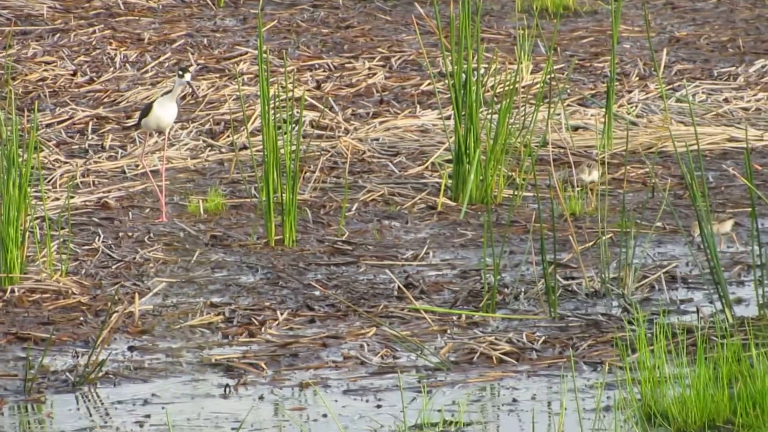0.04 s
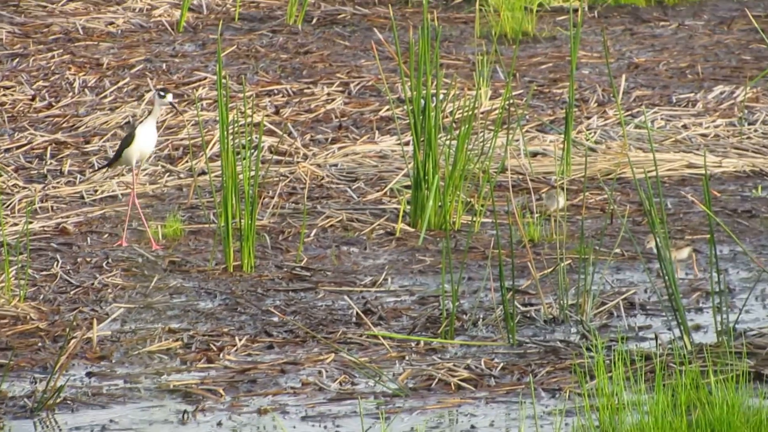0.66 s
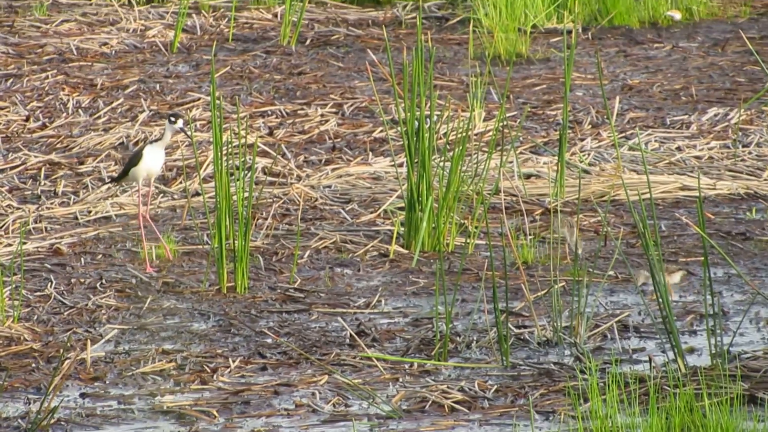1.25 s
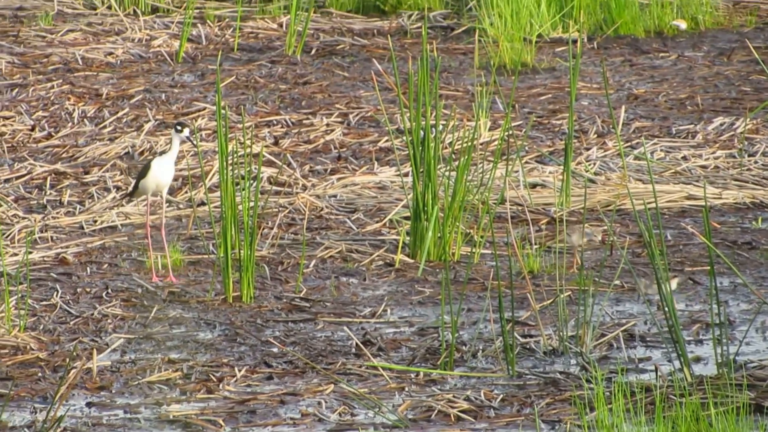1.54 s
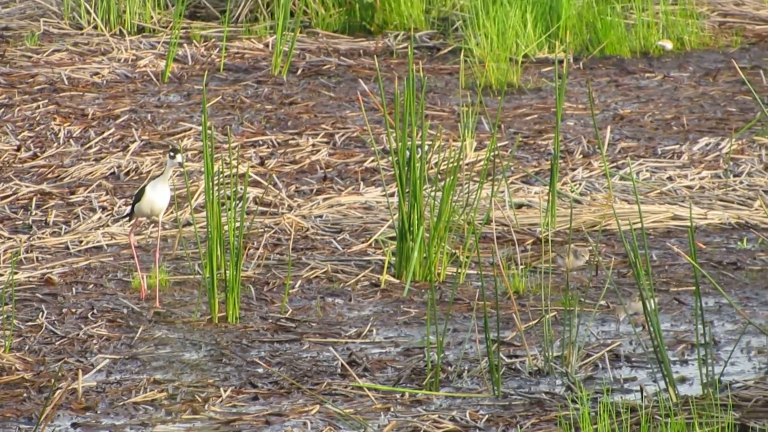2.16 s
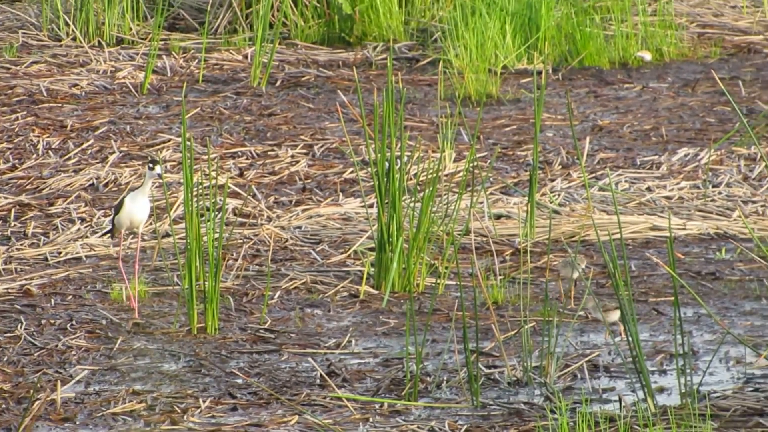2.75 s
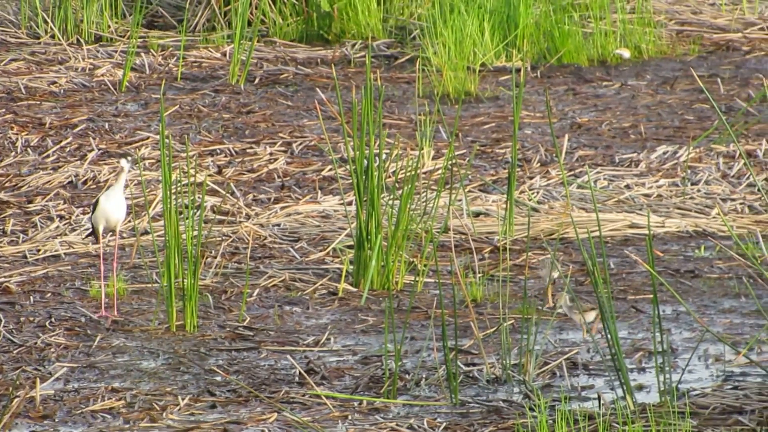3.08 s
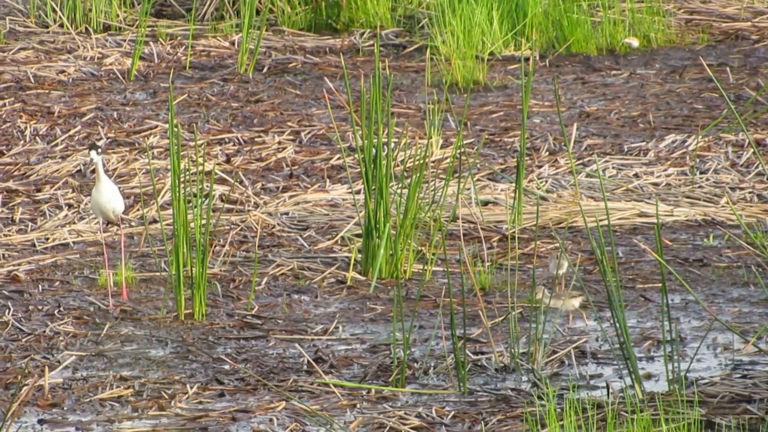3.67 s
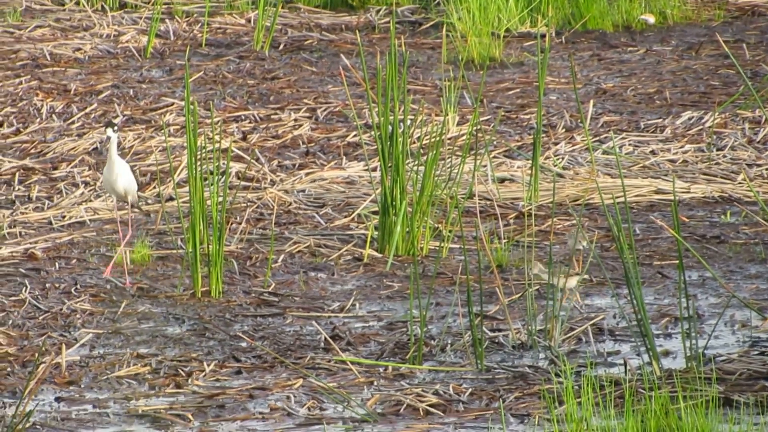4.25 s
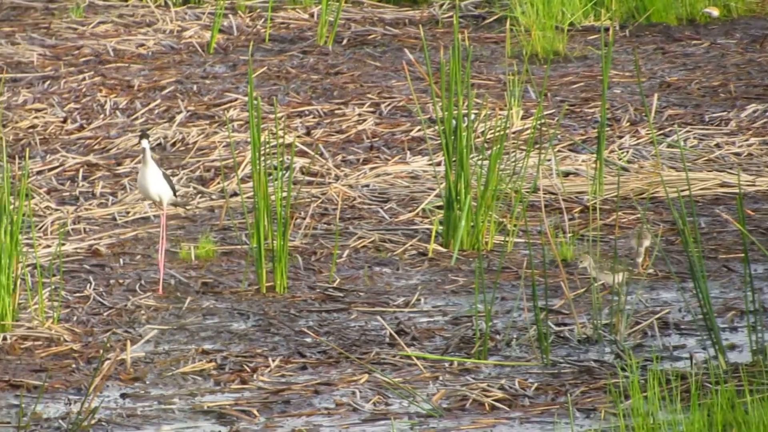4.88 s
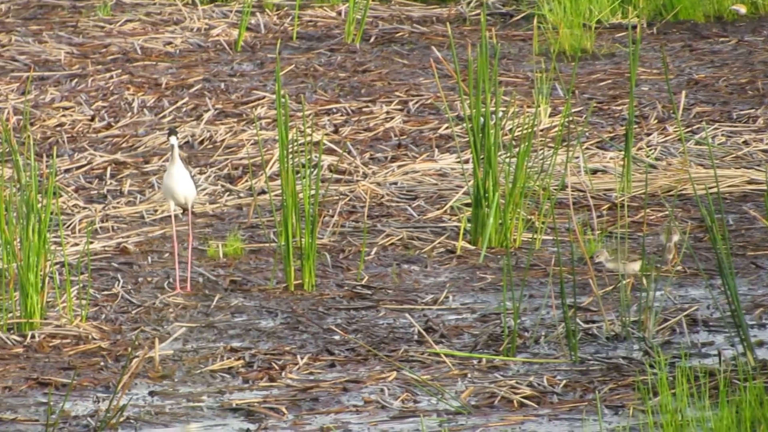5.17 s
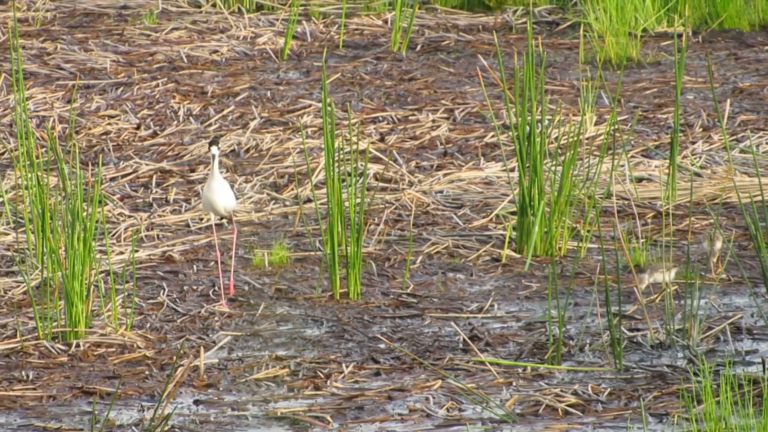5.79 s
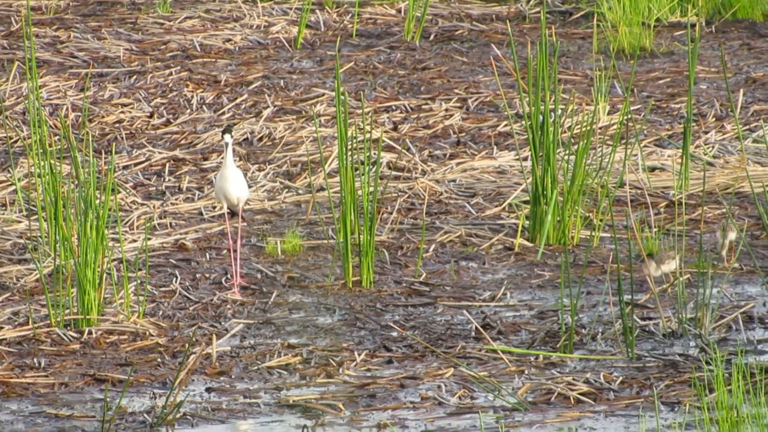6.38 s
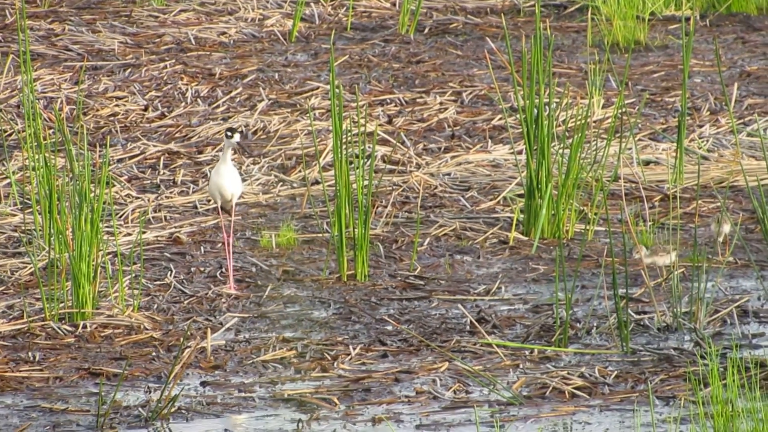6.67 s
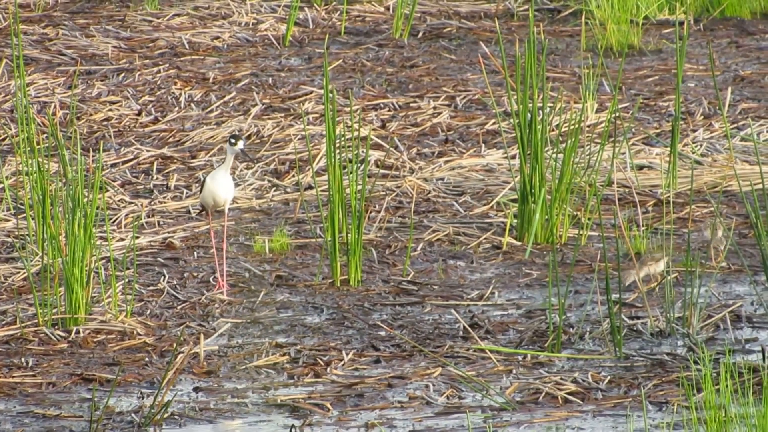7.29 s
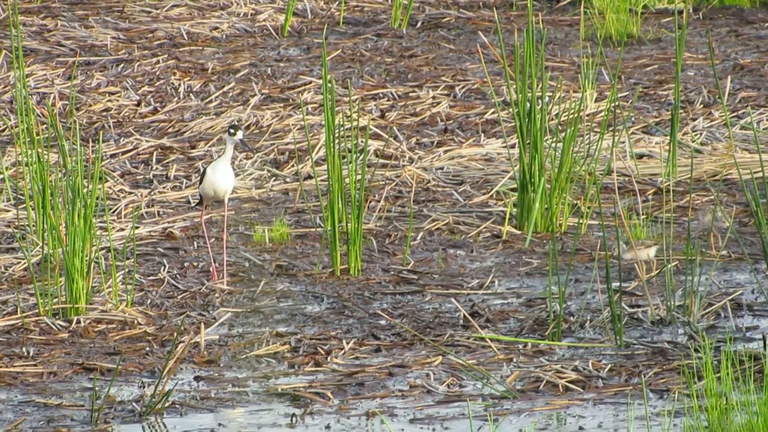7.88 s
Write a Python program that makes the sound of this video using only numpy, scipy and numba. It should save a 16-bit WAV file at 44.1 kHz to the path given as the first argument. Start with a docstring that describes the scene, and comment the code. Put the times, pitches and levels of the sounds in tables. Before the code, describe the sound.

An open marsh is heard through a wind-struck microphone for about eight seconds. A nearby wading bird gives short, sharp yips, each a quick rise and fall in pitch, roughly twice a second from 0.4 seconds to the end, clearest between 3 and 4.5 seconds. Low wind rumble and thumps are the loudest sound, coming at about 0.6 to 1.8 seconds, 2.7 to 4.7, around 6.7, and from 7.4 onward. Each hard buffet makes everything else dip and swell back. A distant songbird trills thinly, mainly between 1 and 2 seconds, and faint, hoarse, falling cries of far waders are scattered through the first six seconds. Dry stalks rustle very lightly, with sharper ticks near 2.5 and 3.3 seconds. Underneath run a steady distant roar, a low traffic-like drone that grows slightly after 5 seconds, soft hiss and a faint high whine.

```python
"""A marsh: a stilt yips close by in quick arches of pitch; far off, waders give sagging cries
and a songbird trills. Dry ticks and rustle sit over a steady distant roar and a low drone.
Gusts buffet the camera's microphone; each hard buffet drives its limiter down,
so the whole marsh ducks and swells back. The camera adds hiss and a thin whine."""
import sys
import numpy as np
from scipy import signal
from scipy.fft import rfft, irfft
from scipy.io import wavfile
from scipy.ndimage import uniform_filter1d
from numba import njit

SR = 44100
rng = np.random.default_rng(int(sys.argv[2]) if len(sys.argv) > 2 else 0)


def log_audio(samples):
    """Write samples as a 16-bit WAV file to the path given in sys.argv[1]."""
    # one column per channel
    frames = np.atleast_2d(samples).T
    # limit to full scale, then quantise
    limited = np.clip(frames, -1, 1)
    pcm = np.round(limited * 32767).astype(np.int16)
    wavfile.write(sys.argv[1], SR, pcm)


N = 349868
TIME, FREQS = np.arange(N) / SR, np.fft.rfftfreq(N, 1 / SR)


def amp(db):
    """Decibels to gain."""
    return 10 ** (np.asarray(db) / 20)


def unit(x):
    """Scale to rms 1."""
    return x / np.sqrt(np.mean(x ** 2) + 1e-20)


def at_hz(points, hz=FREQS):
    """Interpolate on a log-frequency axis."""
    freq_hz, value = np.transpose(points)
    return np.interp(np.log(hz + 1), np.log(freq_hz + 1), value)


def at_time(points):
    """Interpolate at every sample."""
    return np.interp(TIME, *np.transpose(points))


def add(mix, start_s, sound):
    """Mix in at start_s."""
    part = mix[max(round(start_s * SR), 0):][:len(sound)]
    part += sound[:len(part)]


def noise(gain):
    """Coloured noise, rms 1."""
    return unit(irfft(rfft(rng.standard_normal(N)) * gain, N))


def noise_pair(gain, correlation, balance_db=0):
    """Partly correlated stereo noise, rms 1."""
    left, other = rfft(rng.standard_normal((2, N)))
    right = correlation * left + np.sqrt(1 - correlation ** 2) * other
    pair = np.array([left * amp(balance_db / 2), right * amp(-balance_db / 2)])
    return unit(irfft(pair * gain, N))


def burst(colour, envelope, stretch=1):
    """Noise puff with its envelope's energy; stretch scales the colour's frequency axis."""
    size = len(envelope)
    gain = amp(at_hz(colour, np.fft.rfftfreq(size, 1 / SR) / stretch))
    puff = envelope * irfft(rfft(rng.standard_normal(size)) * gain, size)
    return unit(puff) * np.sqrt(np.mean(envelope ** 2))


def waver(size, rate_hz):
    """Smooth random wobble, rms 1."""
    return unit(uniform_filter1d(rng.standard_normal(size), max(int(SR / rate_hz), 1)))


def phase_rad(pitch_hz):
    """Running phase of a moving pitch."""
    return 2 * np.pi * np.cumsum(pitch_hz) / SR


def voice(pitch_hz, throat, harmonics=12):
    """Harmonics weighted by the throat's response."""
    phase = phase_rad(pitch_hz)
    partials = (amp(at_hz(throat, k * pitch_hz)) * np.sin(k * phase) for k in range(1, harmonics + 1))
    return np.sqrt(2) * sum(partials)


# Roar spectrum: freq_hz, gain_db
ROAR_SPECTRUM = [(40, 8), (150, 5.5), (280, -3.5), (450, -6.5), (600, -4), (780, 0.5), (1000, -2),
                 (1400, -10.5), (1900, -19), (2500, -23.5), (3600, -27), (5000, -38), (9000, -48.5)]
# Roar level: time_s, level_db
ROAR_LEVEL = [(0, -29), (.6, -30), (1.5, -30), (2.5, -29), (3.5, -29.5), (4.5, -29), (5.5, -30.5),
              (6.3, -28), (7, -30), (7.93, -28)]
# Roar balance: freq_hz, left_minus_right_db
ROAR_BALANCE = [(100, -5.5), (370, -6), (670, -6.5), (1240, -5.5), (2260, -1), (5000, -3.5)]
# Roar stereo likeness: freq_hz, correlation
ROAR_CORRELATION = [(60, 0.28), (280, 0.22), (620, 0.65), (1350, 0.59), (3000, 0.16), (7000, 0.21)]

def roar():
    """Steady distant roar, leaning right."""
    rush = noise_pair(amp(at_hz(ROAR_SPECTRUM)), at_hz(ROAR_CORRELATION), at_hz(ROAR_BALANCE))
    return amp(at_time(ROAR_LEVEL)) * rush


# Hiss spectrum: freq_hz, gain_db
HISS_SPECTRUM = [(500, 1.5), (3000, -0.5), (5000, 3.5), (7000, 1), (9500, 1), (11500, 0.5), (13000, -0.5),
                 (13800, -7), (14600, -33)]
# Hiss stereo likeness: freq_hz, correlation
HISS_CORRELATION = [(2000, 0.19), (6000, 0.03), (9000, -0.18), (13000, -0.085)]

def camera_noise(hiss_db=-53, whine_db=-52, whine_hz=10480, half_width_hz=260):
    """Microphone hiss and the camera's narrow, fuzzy whine."""
    hiss = noise_pair(amp(at_hz(HISS_SPECTRUM)), at_hz(HISS_CORRELATION))
    whine = noise_pair(1 / (1 + ((FREQS - whine_hz) / half_width_hz) ** 2), correlation=-0.9)
    return amp(hiss_db) * hiss + amp(whine_db) * whine


# Drone resonances: centre_hz, width_hz, gain_db
DRONE_MODES = [(50.3, 29, 3.5), (122.7, 4.7, 5.5), (212.8, 33, -3.5), (251, 23, -10), (463, 6, -8),
               (1630, 880, -22)]
# Drone level: time_s, level_db
DRONE_LEVEL = [(0, -46.5), (.6, -37.5), (2, -43.5), (4.8, -40.5), (5.6, -33.5), (6.3, -31.5), (7.1, -33),
               (7.93, -30.5)]

def drone():
    """Swelling low resonances and a soft rush, like far-off traffic."""
    gain = sum(amp(gain_db) / (1 + (2 * (FREQS - centre_hz) / width_hz) ** 2)
               for centre_hz, width_hz, gain_db in DRONE_MODES)
    return amp(at_time(DRONE_LEVEL)) * noise_pair(gain, correlation=0.71, balance_db=0.5)


# Close ticks: start_s, level_db, decay_s, centre_hz
TICKS = [(.012, -36.5, 0.006, 3050), (0.021, -35.5, .005, 3000), (2.362, -39, .001, 5800),
         (2.527, -33, 0.0011, 3650), (2.562, -26, 0.0031, 3500), (2.5642, -37, 0.0024, 3560),
         (2.570, -26, 0.0023, 3100), (3.283, -30, 0.0022, 2200), (4.228, -41, .012, 3220),
         (4.918, -39, .003, 3400), (5.247, -37.5, 0.0031, 3000), (6.008, -40, .002, 6900),
         (7.33, -40, 0.0098, 2980), (7.848, -34, .001, 3200)]
# Tick and rustle spectrum: ratio_to_centre, gain_db
TICK_SPECTRUM = [(.35, -2), (.75, 8.5), (1, 6.5), (1.35, 2.5), (1.7, -13), (2.7, -12), (4.2, -26)]

def ticks(width=0.5):
    """Dry crackles with hardly any ring, partly unlike left and right."""
    out = np.zeros((2, N))
    t = np.arange(SR // 20) / SR
    for start_s, level_db, decay_s, centre_hz in TICKS:
        envelope = amp(level_db) * np.exp(-t / decay_s)
        mid, side = (burst(TICK_SPECTRUM, envelope, centre_hz) for _ in range(2))
        add(out[0], start_s, mid + width * side)
        add(out[1], start_s, mid - width * side)
    return out / np.hypot(1, width)


def rustle(rate_hz=9, floor_db=-58, spread_db=6, decay_s=0.0033, centre_hz=3300):
    """Tiny random crackles, as from stalks stirred by wind."""
    level_db = floor_db + spread_db * np.minimum(rng.exponential(1, N), 2)
    impulses = amp(level_db) * (rng.random(N) < rate_hz / SR)
    envelope = signal.lfilter([1], [1, -np.exp(-1 / (decay_s * SR))], impulses)
    return envelope * noise_pair(amp(at_hz(TICK_SPECTRUM, FREQS / centre_hz)), correlation=0.46)


# Song notes: start_s, length_s, pitch_hz, relative_db, trill_hz, depth_ratio
SONG_NOTES = [(0.032, .14, 4760, -51, 78, 0.018), (0.954, 0.21, 7000, -55, 110, .07),
              (1.548, .07, 3000, -48, 50, .005), (1.558, 0.27, 7000, -52, 88, 0.038),
              (1.67, 0.13, 3790, -42.5, 54, .025), (1.69, 0.077, 2940, -42, 56, .006),
              (1.756, 0.075, 5030, -47, 210, 0.073), (1.816, 0.078, 3050, -37, 97, 0.0083),
              (1.83, 0.043, 4100, -45, 85, .01), (4.265, 0.15, 4350, -50, 58, .03)]

def songbird(throb=0.81, full_depth=0.03, jitter=0.011, arch=0.021, shimmer=0.28):
    """Thin trills that rise and settle; loudest on each downsweep, deep trills throbbing most."""
    out = np.zeros(N)
    for start_s, length_s, pitch_hz, relative_db, trill_hz, depth_ratio in SONG_NOTES:
        t = np.arange(int(length_s * SR)) / SR
        beat = 2 * np.pi * trill_hz * t
        contour = 1 - arch * (2 * t / length_s - 1) ** 2 - depth_ratio * np.sin(beat)
        glide_hz = pitch_hz * (contour + jitter * waver(len(t), 394))
        pulsing = 1 + throb * min(depth_ratio / full_depth, 1) * np.cos(beat)
        effort = signal.windows.tukey(len(t), 0.7) * pulsing * (1 + shimmer * waver(len(t), 90))
        add(out, start_s, amp(relative_db) * effort * np.sin(phase_rad(glide_hz)))
    return out


# Wader cries: start_s, length_s, pitch_hz, relative_db, throat_hz, fall_ratio
WADER_CRIES = [(0.072, .115, 1050, -53, 2330, 0.075), (0.622, .07, 1120, -58, 4300, .09),
               (0.73, 0.042, 1062, -53, 3100, .1), (2.061, 0.061, 1080, -42.5, 2000, .12),
               (2.422, .11, 1136, -44.5, 2200, 0.16), (2.767, 0.16, 1230, -52.5, 3280, 0.14),
               (3.368, 0.15, 1196, -50.5, 3400, 0.06), (3.789, 0.079, 1080, -55, 3800, .05),
               (4.47, .04, 1390, -52, 5500, 0.26), (4.512, .05, 1330, -55, 5500, 0.176),
               (4.773, 0.075, 1120, -53, 2300, 0.08), (5.257, 0.18, 1130, -54, 2760, 0.063),
               (5.948, 0.074, 1244, -47.5, 3300, 0.24), (6.253, 0.043, 1235, -56, 3400, .17)]

def far_waders(jitter=0.014, skirt_db=-18, shimmer=0.31):
    """Hoarse, sagging cries; one throat resonance picks out a harmonic."""
    out = np.zeros(N)
    for start_s, length_s, pitch_hz, relative_db, throat_hz, fall_ratio in WADER_CRIES:
        progress = np.linspace(0, 1, int(length_s * SR))
        sag = 1 - fall_ratio * progress ** 1.7
        glide_hz = pitch_hz * sag * (1 + jitter * waver(len(progress), 400))
        throat = [(throat_hz * 2 ** octave, skirt_db * abs(octave)) for octave in (-1, 0, 1, 2)]
        effort = np.sin(np.pi * progress) * (1 + shimmer * waver(len(progress), 200))
        add(out, start_s, amp(relative_db) * effort * voice(glide_hz, throat, harmonics=5))
    return out


# Stilt yips: peak_s, top_hz, relative_db, length_s, hollow_db, body_db
STILT_YIPS = [(0.403, 905, -48.5, 0.034, 0, 4), (0.939, 830, -54.5, 0.021, -5, 9),
              (1.508, 1000, -38, 0.031, 0, -5), (1.896, 908, -44.5, 0.035, 9, 5.5),
              (2.337, 898, -42, 0.023, 25, 0), (2.764, 967, -39.5, 0.037, 9.5, 3),
              (3.265, 984, -34, 0.033, 0, -1.5), (3.967, 968, -35, 0.032, 13, -1.5),
              (4.406, 1011, -32, 0.035, 10, -5), (4.956, 888, -42.5, 0.022, 39, -0.5),
              (5.626, 905, -43, 0.035, 27, 3.5), (6.109, 978, -37.5, 0.027, 3, -4),
              (6.423, 1024, -37, 0.041, -4, -1), (6.764, 956, -41.5, 0.035, 7, -3),
              (7.139, 919, -43.5, 0.03, 15, 0), (7.549, 983, -37, 0.029, 9, -20)]
# Throat and bill response: freq_hz, gain_db
STILT_THROAT = [(900, -12), (1750, -2.5), (1940, 0), (2030, -3.5), (2600, 2.5), (3000, -4), (3800, -3),
                (4500, -0.5), (4950, -1), (5450, -7.5), (5900, -17.5), (7000, -20.5), (8200, -23.5),
                (10000, -21), (13000, -27)]

def stilt(rise_share=0.63, jitter=0.0057, shimmer=0.15, rasp_db=-22, clear_hz=1020):
    """Quick pitch arches that swell and stop short, with a rasp of air in each cycle."""
    out = np.zeros(N)
    grid_hz = np.geomspace(500, 14000, 300)
    hollow = np.exp(-((grid_hz - 2900) / 190) ** 2)  # dip that varies as the head turns
    body = 1 / (1 + (grid_hz / 2350) ** 12)  # low shelf
    for peak_s, top_hz, relative_db, length_s, hollow_db, body_db in STILT_YIPS:
        t = np.arange(-rise_share * length_s, (1 - rise_share) * length_s, 1 / SR)
        arch_hz = top_hz / (1 + np.where(t < 0, 520, 430) * t ** 2)
        glide_hz = arch_hz * (1 + jitter * waver(len(t), 530))
        swell_rad = np.interp(t, [t[0], 0, t[-1]], [0, np.pi / 2, np.pi])
        swell = np.abs(np.sin(swell_rad)) ** np.where(t < 0, 1.33, 0.98)
        effort = swell * (1 + shimmer * waver(len(t), 500))
        throat_db = at_hz(STILT_THROAT, grid_hz) - hollow_db * hollow + body_db * body
        tone = effort * voice(glide_hz, np.column_stack([grid_hz, throat_db]))
        rasp = burst(STILT_THROAT, effort * (1 + np.cos(phase_rad(glide_hz))))
        slack = (clear_hz / top_hz) ** 8.7  # lower yips are slacker, raspier
        add(out, peak_s + t[0], amp(relative_db) * (tone + amp(rasp_db) * slack * rasp))
    return out


# Gusts: peak_s, strength_db, fade_s
GUSTS = [(0.646, 1.5, 0.042), (0.93, -12, 0.22), (1.22, -5.5, 0.14), (1.44, -3.5, 0.097), (1.78, -9, .15),
         (2.237, -15, 0.077), (2.676, -7, 0.019), (2.81, 1.5, 0.04), (3.0, -6.5, 0.17), (3.37, -2.5, 0.12),
         (3.521, 5, 0.052), (3.81, -2.5, 0.11), (4.0, -6, 0.099), (4.54, -11.5, 0.45), (4.724, -4, 0.018),
         (5.47, -12.5, 0.15), (6.002, -10, 0.044), (6.46, -13, 0.11), (6.69, -1.5, 0.076),
         (6.85, -10.5, 0.1), (7.41, -2, 0.088), (7.55, 1, 0.097), (7.73, 0, 0.15)]

def wind_strength_db(calm_db=-33.5, lump_db=2, lump_hz=11.6):
    """Each gust builds out of the calm and dies away in uneven lumps."""
    power = np.full(N, amp(calm_db) ** 2)
    for peak_s, strength_db, fade_s in GUSTS:
        age = (TIME - peak_s) / fade_s
        falloff = np.minimum(np.where(age < 0, age ** 2, age), 20)
        power += (amp(strength_db) * np.exp(-falloff)) ** 2
    lumps = noise(FREQS / lump_hz * np.exp(-FREQS / lump_hz))
    return 10 * np.log10(power) + lump_db * lumps


# Light-wind spectrum: freq_hz, gain_db
BREEZE_SPECTRUM = [(10, -29), (25, 3), (50, 11), (110, 2.5), (170, -24.5), (300, -31), (600, -54),
                   (1500, -76.5), (5000, -110)]
# Strong-wind spectrum: freq_hz, gain_db
GUST_SPECTRUM = [(10, -15), (25, 4), (55, 4.5), (120, -0.5), (200, -10.5), (330, -25.5), (600, -50),
                 (1500, -64), (5000, -73)]

def turbulence(level_db, light_db=-18, strong_db=2, evenness=0.74):
    """Pressure churn, brighter with strength; eddies of like size follow closely."""
    share = np.clip((level_db - light_db) / (strong_db - light_db), 0, 1)
    churn = np.sqrt(1 - share) * noise(amp(at_hz(BREEZE_SPECTRUM)))
    churn += np.sqrt(share) * noise(amp(at_hz(GUST_SPECTRUM)))
    power = np.abs(signal.hilbert(churn)) ** 2
    smooth_power = uniform_filter1d(uniform_filter1d(power, size=700), size=700)
    return amp(level_db) * unit(churn / smooth_power ** (evenness / 2))


# Hard eddies: peak_s, peak_db, swing_hz, half_length_cycles, knock_relative_db
BUFFETS = [(.599, 7.5, 90, 0.42, -14.5), (1.118, 6.5, 197, 0.32, -9), (1.191, 4.5, 84, 0.34, -37),
           (1.235, 10.5, 52, 0.38, -38), (1.379, 10, 74.4, 0.29, -30), (2.771, 6, 131, 0.14, -19),
           (2.791, 12, 156.4, 0.86, -13.5), (2.866, 11, 152, 0.28, -13), (3.308, 6.5, 77, 0.56, -37),
           (3.346, 2, 200, 0.25, -10), (3.358, 11, 66, 0.22, -20), (3.426, 12.5, 75, .3, -42),
           (3.436, 14.5, 70, 0.2, -10), (3.503, 15, 90, 0.28, -28), (3.84, 10.5, 86, 0.16, -19.5),
           (6.666, 10, 98, 0.41, -19), (6.704, 11.5, 86, .33, -36), (7.376, 10, 75, 0.27, -29),
           (7.395, 5.5, 150, 0.44, -13), (7.439, 10.5, 64.7, 0.29, -29), (7.472, 11.5, 115, 0.37, -16),
           (7.555, 13, 66.3, 0.21, -14.5), (7.705, 8, 135, 0.75, -28), (7.789, 14, 97, 0.29, -18)]
# Knock at an eddy's core: freq_hz, gain_db
KNOCK_SPECTRUM = [(100, 2), (250, 3), (380, 1.5), (600, -13.5), (850, -20), (1400, -34), (4000, -48)]

def wind(left_db=-3, knock_left_db=-7, knock_trim_db=-3.5, knock_s=0.0034, stray_db=-22):
    """Turbulence and hard eddies push the microphone's two channels in opposite directions."""
    level_db = wind_strength_db()
    pressure = turbulence(level_db)
    knocks = np.zeros(N)
    for peak_s, peak_db, swing_hz, half_length_cycles, knock_relative_db in BUFFETS:
        near = slice(int((peak_s - 0.05) * SR), int((peak_s + 0.05) * SR))
        t = TIME[near] - peak_s
        grip = np.exp(-(t * swing_hz / half_length_cycles) ** 2 / 2)
        swing = rng.choice([-1, 1]) * amp(peak_db) * np.cos(2 * np.pi * swing_hz * t)
        pressure[near] += grip * (swing - pressure[near])  # the eddy takes over the flow
        knock = burst(KNOCK_SPECTRUM, np.exp(-(t / knock_s) ** 2 / 2))
        knocks[near] += amp(peak_db + knock_relative_db + knock_trim_db) * knock
    stray = amp(level_db + stray_db) * noise(amp(at_hz(GUST_SPECTRUM)))  # alike in both channels
    left = -amp(left_db) * pressure - amp(knock_left_db) * knocks
    return np.array([left, pressure + knocks]) + stray


def scatter(x, t60_s, size=16000):
    """Sparse echoes off reeds and banks, different on each side."""
    t = np.arange(size) / SR
    taps = rng.standard_normal((2, size)) * (rng.random((2, size)) < 0.05) * amp(-60 * t / t60_s)
    taps /= np.linalg.norm(taps, axis=1, keepdims=True)
    return signal.fftconvolve(x[None], taps, axes=1)[:, :N]


def scene():
    """Near stilt almost dry, far birds blurred, over roar and wind."""
    yips, waders, song = stilt(), far_waders(), songbird()
    birds = yips * amp([[0.3], [-0.3]]) + amp(-9.5) * scatter(yips, t60_s=0.07)
    birds += amp(-20) * scatter(yips, t60_s=0.47)  # echo off the banks
    birds += amp(-2) * waders + amp(-4) * scatter(waders, t60_s=0.17)
    birds += amp(-7) * song + amp(-6.5) * scatter(song, t60_s=0.16)
    return birds + ticks() + rustle() + roar() + camera_noise() + drone() + wind()


@njit
def limiter_db(over_db, attack_s=0.00014, hold_s=0.15, release_s=0.3, memory_s=0.6, memory_share=0.49):
    """Gain reduction: quick grab, short hold, slower recovery after long overloads."""
    out = np.zeros(len(over_db))
    cut_db, slow_db, wait_s = 0., 0., 0.
    for i in range(len(over_db)):
        wait_s -= 1 / SR
        if over_db[i] > cut_db:
            cut_db += (over_db[i] - cut_db) / (attack_s * SR)
            wait_s = hold_s
        elif wait_s < 0:
            cut_db += (slow_db - cut_db) / (release_s * SR)
        slow_db += (memory_share * cut_db - slow_db) / (memory_s * SR)
        out[i] = cut_db
    return out


# Camera notches: centre_hz, width_hz
NOTCHES = [(3935, 260), (7870, 160)]

def record(dry, cutoff_hz=14600):
    """Camera chain: limiter ducking on wind peaks, two notches, soft clip, low-pass."""
    over_db = 20 * np.log10(np.maximum(np.abs(dry).max(0), 1))
    ducked = dry / amp(limiter_db(over_db))
    for centre_hz, width_hz in NOTCHES:
        ducked = signal.lfilter(*signal.iirnotch(centre_hz, centre_hz / width_hz, SR), ducked)
    clipped = ducked / (1 + ducked ** 16) ** (1 / 16)
    lowpass = signal.firwin(255, cutoff_hz, window=("kaiser", 9), fs=SR)
    return signal.oaconvolve(clipped, lowpass[None], "same")


dry = scene()
out = record(dry)
log_audio(out)
```